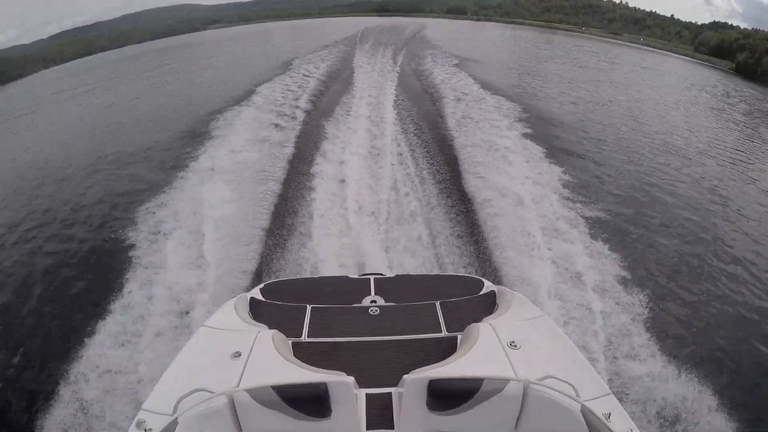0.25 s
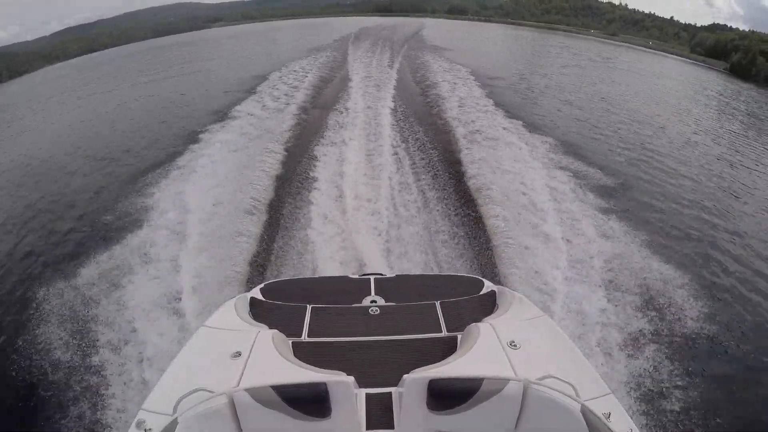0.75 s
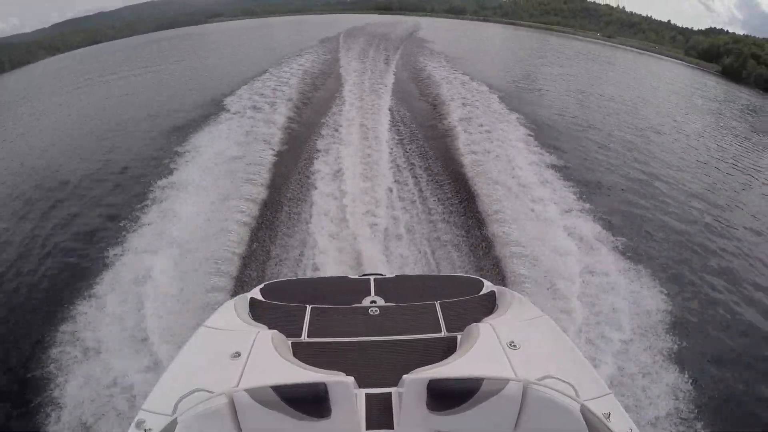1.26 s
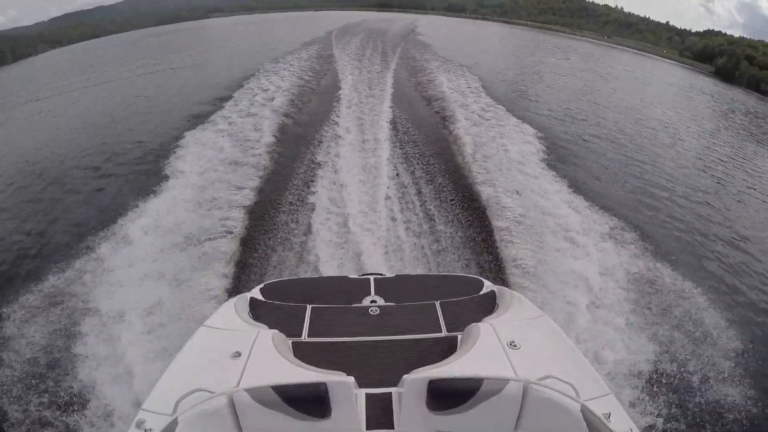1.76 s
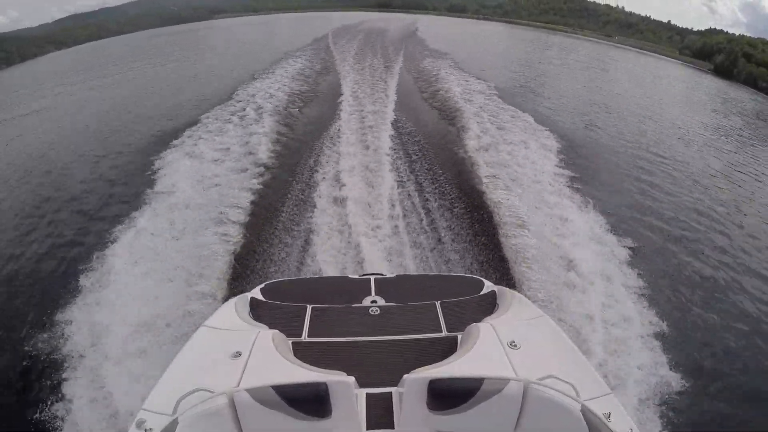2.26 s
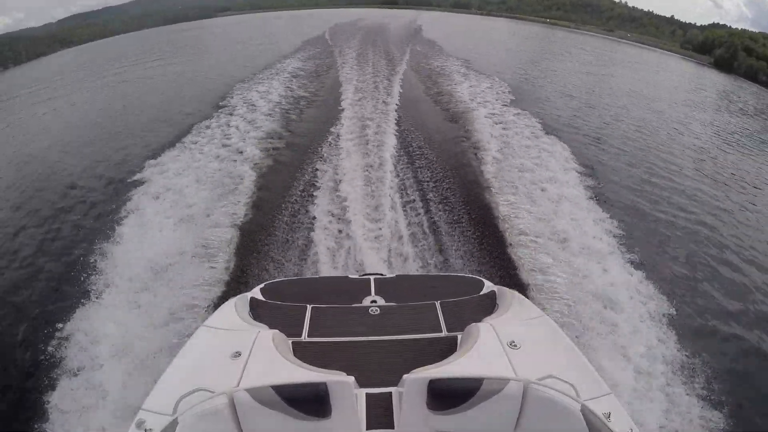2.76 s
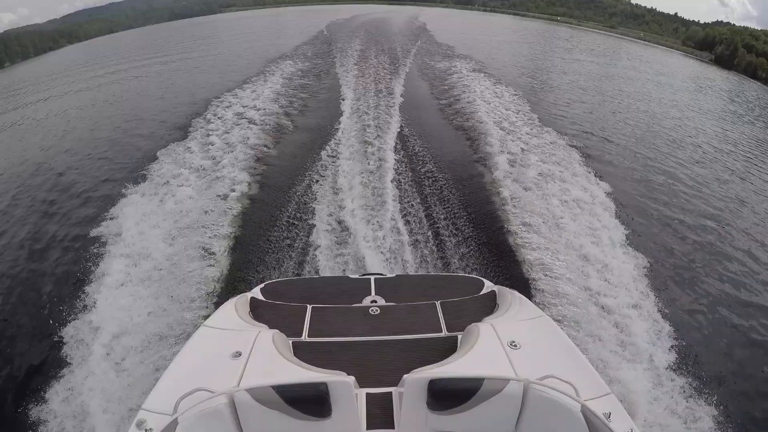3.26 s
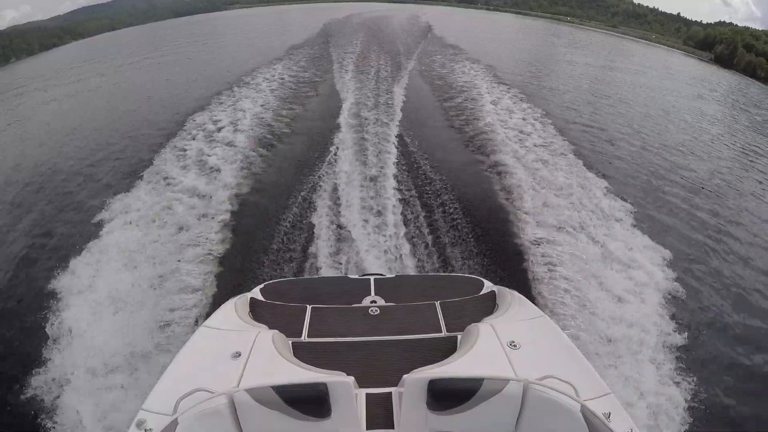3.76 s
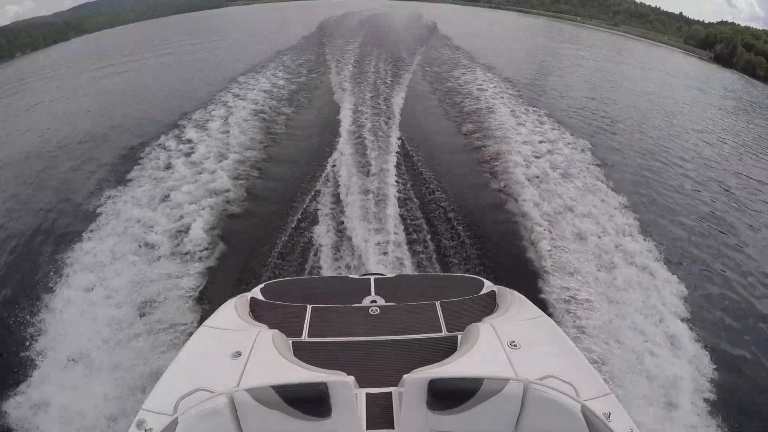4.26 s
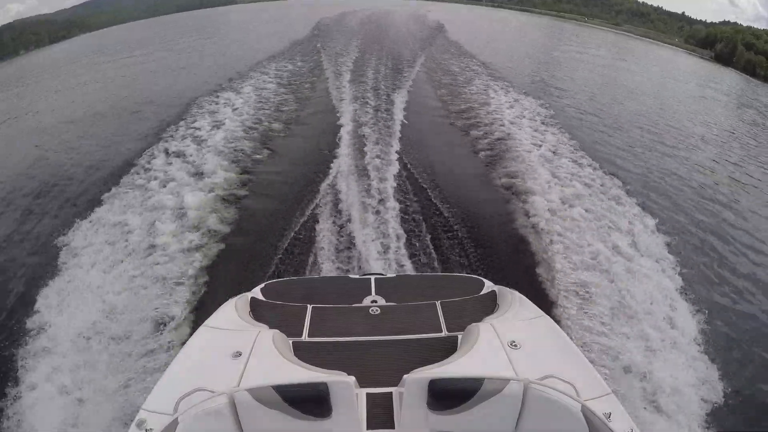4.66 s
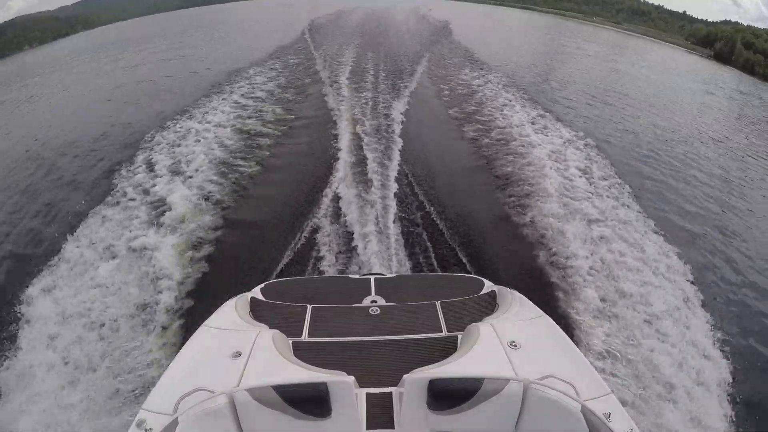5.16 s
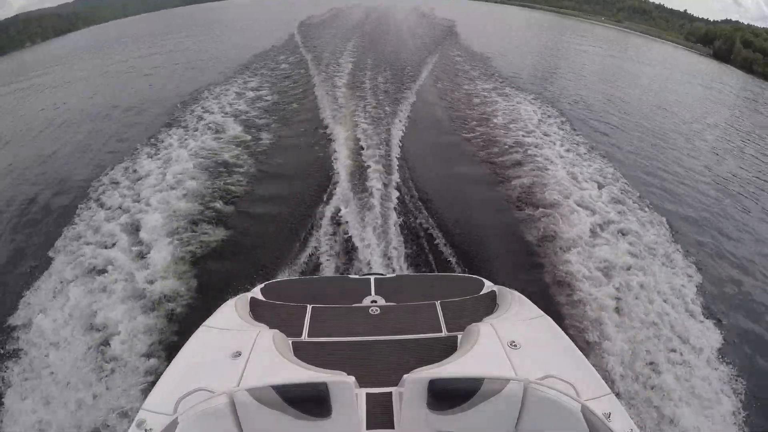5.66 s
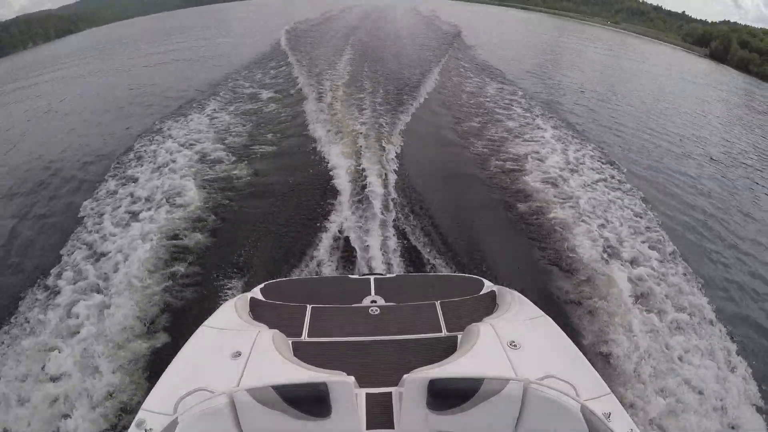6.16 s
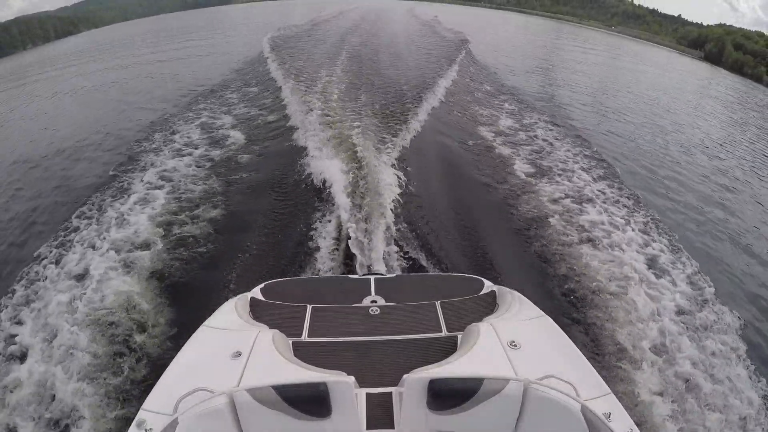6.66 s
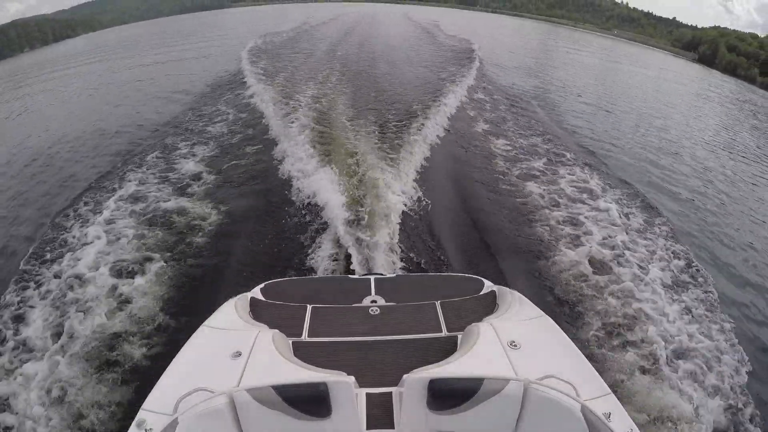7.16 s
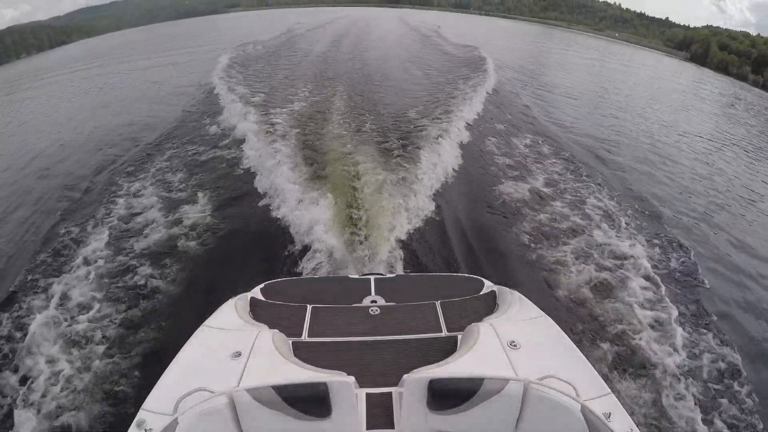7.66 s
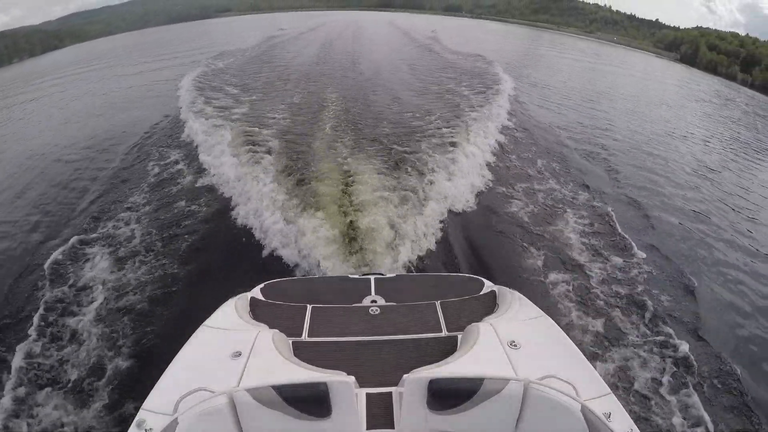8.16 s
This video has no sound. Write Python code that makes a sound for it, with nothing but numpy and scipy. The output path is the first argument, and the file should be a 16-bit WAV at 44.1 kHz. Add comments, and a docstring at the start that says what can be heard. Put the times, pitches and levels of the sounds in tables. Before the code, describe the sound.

Wind pops and rumbles on the microphone over rushing water, then eases as a boat's engine hum and foamy wash grow.

```python
"""A jet boat throttles back on a lake, heard from the deck. At first fast air pops, ticks and flutters on
the microphone, over deep buffeting and the roar of water under the hull; spray hisses off the planing hull.
From about 3 s the wind eddies die away as the boat slows. From about 5 s the eight-cylinder engine drones
louder through the hull. Near 6 s the wake swells astern and a high hiss opens up. Around 7 s a rough low
engine churn rises and a thin top hiss steps up; near 8 s the engine note sags a little."""
import sys
import numpy as np
from scipy import signal
from scipy.fft import rfft, irfft, next_fast_len
from scipy.io import wavfile
from scipy.ndimage import uniform_filter1d, minimum_filter1d, map_coordinates

SR = 44100
rng = np.random.default_rng(int(sys.argv[2]) if len(sys.argv) > 2 else 0)


def transcribe(u):
    """Save the signal u as a 16-bit wav file named by the first command-line argument.

    u: samples, shape (n,) or (channels, n), limited to [-1, 1]; the rate is SR.
    q: integer samples, one column per channel.
    """
    v = np.clip(np.atleast_2d(u).T, -1, 1)
    q = np.round(v * 32767).astype(np.int16)
    wavfile.write(sys.argv[1], SR, q)


N = 370881
TIME = np.arange(N) / SR


def amp(db):
    return 10 ** (np.asarray(db) / 20)


def unit(x):
    return x / np.sqrt(np.mean(x ** 2) + 1e-20)


def curves(rows):
    """Automation lanes: one value a sample for each column after the time."""
    times, *columns = np.transpose(rows)
    return [np.interp(TIME, times, column) for column in columns]


def wobble(rate):
    """Smooth random modulation, rate knots a second."""
    knots = rng.standard_normal(int(N * 400 / SR))
    coarse = np.arange(0, N + 16, 16)
    return np.interp(np.arange(N), coarse, map_coordinates(knots, [coarse * rate / SR]))


def swells(rows):
    """An envelope of flat-topped swells from rows of centre t/s, length/s, level/dB."""
    t = np.arange(0, N / SR, .001)
    centre, length, db = np.transpose(rows)[..., None]
    shapes = np.exp(-(2 * (t - centre) / length) ** 4)
    return np.interp(TIME, t, np.sum(amp(db) * shapes, axis=0))


def filtered(x, response):
    """x through a gain that is a function of frequency."""
    size = next_fast_len(N + 8192)
    return irfft(rfft(x, size) * response(np.fft.rfftfreq(size, 1 / SR)), size)[..., :N]


def coloured(x, eq):
    """x through an EQ curve of f/Hz, level/dB points; white noise keeps its rms."""
    f, db = np.transpose(eq)
    return filtered(x, lambda hz: unit(amp(np.interp(np.log(hz + 1), np.log(f + 1), db, -120, -120))))


def steady(eq):
    """An even noise bed of rms 1."""
    return unit(coloured(rng.standard_normal(N), eq))


def rush(eq, patchy_db):
    """A noise bed of rms 1 with patches of random gain in time and frequency."""
    spectra = signal.stft(rng.standard_normal(N), nperseg=512)[2]
    patches = uniform_filter1d(rng.standard_normal(spectra.shape), size=6, axis=0)
    patches = unit(uniform_filter1d(patches, size=10, axis=1))
    noise = signal.istft(spectra * amp(patchy_db * patches), nperseg=512)[1][:N]
    return unit(coloured(noise, eq))


def evened(x, share=.3, window_s=.035):
    """x at rms 1, with a share of its short level swings ironed out."""
    level = np.sqrt(np.abs(uniform_filter1d(x ** 2, size=int(window_s * SR))) + 1e-3)
    return unit(x / level ** share)


def burst(t, width_s):
    """A bell-shaped noise transient with the same energy on every hit."""
    shape = np.exp(-.5 * (t / width_s) ** 2)
    noise = shape * rng.standard_normal(len(t))
    return noise * np.linalg.norm(shape) / np.linalg.norm(noise)


# Noise-bed faders: t/s, then level/dB of spray, wash, folding wave, wake, high hiss, top hiss
BED_FADERS = [(0, -41.5, -30, -67, -47.5, -73, -109), (2, -42, -29.5, -68, -44.5, -62.5, -105),
              (3.1, -39, -43.5, -47, -50, -68, -101), (3.7, -37, -41, -42, -54, -67.5, -98),
              (4.8, -35, -33.5, -35.5, -65, -67, -92.5), (5.6, -36, -32.5, -34, -44, -59.5, -91),
              (5.9, -36, -31, -32, -38.5, -51.5, -84.5), (6.3, -40, -30, -31, -36, -44.5, -73.5),
              (6.7, -37, -27, -32, -36.5, -44.5, -73.5), (7, -37, -27, -31, -35, -45, -64.5),
              (7.2, -40, -30.5, -33.5, -35, -47, -57.5), (8.41, -43, -31, -33.5, -33, -48, -57.5)]
# EQ of each of those layers: f/Hz, level/dB
SPRAY_EQ = [(1000, -30.5), (1600, -27.5), (2300, 1), (3000, -1), (3700, -0.5), (4500, -6), (6000, -8.5),
            (7500, -19.5), (10000, -34.5), (13000, -69.5)]
WASH_EQ = [(260, -32.5), (450, -2), (750, -1), (1000, -1), (1300, -5), (1800, -14), (2600, -31.5),
           (4000, -71)]
FOLDING_WAVE_EQ = [(800, -34), (1300, -8.5), (1700, -4), (2200, -7.5), (2600, -13.5), (3500, -38)]
WAKE_EQ = [(1530, -38.5), (2600, -16.5), (2950, 0), (3310, -3), (4130, -1.5), (4460, -0.5), (5650, -2),
           (7600, -17.5), (9880, -39), (16700, -120)]
HIGH_HISS_EQ = [(4240, -10.5), (7200, -3), (11200, -22), (12000, -30), (15600, -50), (22000, -120)]
TOP_HISS_EQ = [(6760, -34), (11500, -9), (12300, -1), (13100, 0), (14100, -1.5), (15100, -7)]

def water_and_hiss():
    """Spray flies off the hull and the wake washes closer as it settles; two plain hiss bands sit above."""
    spray_db, wash_db, wave_db, wake_db, high_db, top_db = curves(BED_FADERS)
    flicker = amp(0.42 * wobble(40))
    water = amp(spray_db) * rush(SPRAY_EQ, patchy_db=0.34)
    water += amp(wash_db) * rush(WASH_EQ, patchy_db=1.24)
    water += amp(wave_db) * rush(FOLDING_WAVE_EQ, patchy_db=0.85)
    water += amp(wake_db) * rush(WAKE_EQ, patchy_db=0.4)
    high_hiss = amp(high_db) * rush(HIGH_HISS_EQ, patchy_db=1.5)  # around 7 kHz, opens up near 6 s
    top_hiss = amp(top_db) * rush(TOP_HISS_EQ, patchy_db=1.2)  # thin, 12-15 kHz, steps up near 7 s
    return flicker * (water + high_hiss) + top_hiss


# Engine pitch: t/s, firing rate f/Hz
FIRING_RATE = [(0, 117.7), (5.7, 118.6), (6.15, 118), (7.2, 117.4), (7.85, 117.1), (8, 112.4),
               (8.41, 111.6)]
# Fader of the low drone: t/s, level/dB
DRONE_FADER = [(0, -35), (1.2, -31.5), (1.6, -24), (2.1, -29.5), (3.3, -24), (4.3, -26.5), (4.7, -21),
               (4.9, -23.5), (5.2, -16), (5.45, -22), (5.62, -16.5), (5.8, -22.5), (5.95, -17), (6.2, -19),
               (6.55, -21), (6.92, -12), (7.15, -16.5), (7.5, -24), (7.85, -12.5), (8, -23), (8.2, -18.5),
               (8.41, -25.5)]
# Engine-bay faders: t/s, then level/dB of middle orders, boom, upper boom
BAY_FADERS = [(0, -29.5, -32.5, -35), (4.5, -39.5, -37, -47), (5, -28.5, -31.5, -41),
              (5.5, -37.5, -37.5, -41), (6.2, -29, -32, -42), (6.45, -31, -32.5, -41),
              (6.65, -39, -26, -43), (6.95, -25.5, -37.5, -27.5), (7.15, -19, -31.5, -30.5),
              (7.45, -29, -26.5, -31.5), (7.75, -27.5, -26, -28.5), (8.05, -19.5, -25, -30.5),
              (8.2, -32.5, -26.5, -32.5), (8.41, -39.5, -27, -34)]
# Engine partials: multiple of the cycle rate, level/dB
LOW_ORDERS = [(3, -11), (8, 1.5)]
MIDDLE_ORDERS = [(10, 3.5), (12, 0.5), (14, 0)]
# EQ of the bay's two boom bands and of the firing tone's rough skirt: f/Hz, level/dB
BOOM_EQ = [(220, -25.5), (270, -7), (295, 0.5), (320, -3), (345, -7), (400, -23.5)]
UPPER_BOOM_EQ = [(300, -18), (335, -3.5), (355, -3), (378, -7.5), (410, -10.5), (445, -18), (492, -5),
                 (535, -11.5), (700, -37)]
SKIRT_EQ = [(85, -25.5), (108, 3), (118, 7), (135, -8.5), (170, -9), (210, -10.5), (260, -25.5)]

def engine():
    """Uneven firing makes each engine order swell and drift; the engine bay booms in ragged lumps."""
    cycle_phase = 2 * np.pi * np.cumsum(curves(FIRING_RATE)[0]) / SR / 8  # eight firings a cycle
    drone_db = curves(DRONE_FADER)[0]
    middle_db, boom_db, upper_db = curves(BAY_FADERS)

    def orders(table, swell_db, drift_rad):
        tone = np.zeros(N)
        for order, db in table:
            level = np.sqrt(2) * amp(db + swell_db * wobble(9))
            tone += level * np.sin(order * cycle_phase + drift_rad * wobble(14))
        return tone

    boom = amp(boom_db) * steady(BOOM_EQ) + amp(upper_db) * steady(UPPER_BOOM_EQ)
    boom *= unit(amp(wobble(22)))
    skirt = amp(drone_db - 3.5) * steady(SKIRT_EQ)
    drone = amp(drone_db) * orders(LOW_ORDERS, swell_db=0.68, drift_rad=1.03)
    middle = amp(middle_db) * orders(MIDDLE_ORDERS, swell_db=2.8, drift_rad=1.44)
    return drone + middle + boom + skirt


# Strength of the air over the microphone: t/s, level/dB
WIND_STRENGTH = [(0, -14.5), (.3, -16), (.5, -18), (1.1, -18.5), (1.4, -16), (1.55, -19), (1.65, -24),
                 (1.85, -20), (2.04, -25), (2.2, -21.5), (3, -24.5), (4, -27), (5, -31.5), (6, -33.5),
                 (7, -38), (8.41, -36)]

def ride_wind(db, slope):
    """A level that is db at a wind strength of -18 dB and moves slope dB per dB."""
    return db + slope * (curves(WIND_STRENGTH)[0] + 18)


# EQ of the low, ragged tearing and churn: f/Hz, level/dB
TEARING_EQ = [(100, -47), (170, 1), (220, 0.5), (300, -3.5), (400, -6), (550, -15.5), (900, -47.5)]

def tearing():
    """Air tears raggedly at the microphone; a rough engine churn rises late in the same low band."""
    airflow = amp(ride_wind(-19, slope=1.01))
    gusts = amp(ride_wind(-5, slope=-0.33)) * (swells(GUSTS) + puffs())  # slow air tears deeper
    engine_churn = amp(-28) / (1 + np.exp((7.05 - TIME) / 0.21))  # fades in around 7 s
    lumps = amp(2.5 * wobble(45) + 1.1 * wobble(6.1))
    return (airflow + gusts + engine_churn) * unit(lumps * rush(TEARING_EQ, patchy_db=2.0))


# Low-end faders: t/s, buffeting level/dB, roar level/dB
RUMBLE_FADERS = [(0, -14, -9), (.5, -16.5, -11.5), (.85, -13.5, -12), (1.1, -15, -15.5), (1.6, -15, -14),
                 (2, -17, -12.5), (2.3, -20, -14.5), (2.7, -20.5, -12.5), (3, -17, -16.5),
                 (3.6, -18, -15.5), (4.1, -16.5, -17.5), (4.4, -24.5, -16.5), (4.6, -18.5, -15.5),
                 (5, -24, -20), (5.8, -19.5, -19), (6.5, -28.5, -19), (7.2, -26, -17.5), (7.7, -27, -20.5),
                 (8.2, -21, -19.5), (8.41, -22.5, -15.5)]
# EQ of the wind buffeting and the hull roar: f/Hz, level/dB
BUFFET_EQ = [(6, -17), (14, -9), (22, -10.5), (33, 3), (44, 8), (52, -1), (65, 5), (90, -6.5), (130, -38.5)]
ROAR_EQ = [(30, -19), (60, -4.5), (80, 2), (110, 4), (150, 1.5), (200, -4.5), (280, -15), (450, -29.5)]
# Brief dropouts of the low end: centre t/s, length/s, share removed/dB
LULLS = [(2.84, 0.032, -8), (3.27, 0.021, -5), (4.0, 0.02, 0)]

def rumble():
    """Slow wind pressure on the microphone and the roar of water under the hull, with tearing on top."""
    buffet_db, roar_db = curves(RUMBLE_FADERS)
    tear = tearing()
    roar = amp(roar_db + 0.5 * wobble(6.1)) * evened(rush(ROAR_EQ, patchy_db=0.9))
    buffet = amp(buffet_db) * evened(steady(BUFFET_EQ))
    duck = 1 - np.clip(swells(LULLS), 0, .9)
    return (buffet + roar + tear) * duck


# The loudest ticks in the fast air: t/s, level/dB
TICK_CUES = [(0.0465, -18), (0.116, -11.5), (0.1346, -24.5), (0.1548, -21.5), (0.1877, -18),
             (0.2209, -22.5), (0.2384, -15), (0.2538, -14.5), (0.2984, -22), (0.3225, -15.5), (0.396, -25),
             (0.4254, -21.5), (0.4319, -19), (0.4504, -19.5), (0.509, -24), (0.5474, -17.5), (0.631, -27.5),
             (0.6693, -22), (0.703, -22.5), (0.7087, -18.5), (0.7317, -27.5), (0.7467, -20),
             (0.7706, -25.5), (0.8044, -27), (0.828, -20.5), (0.8667, -21), (0.9233, -18), (0.9755, -22.5),
             (0.9971, -22.5), (1.0252, -25), (1.0532, -28.5), (1.0789, -19), (1.0874, -15.5), (1.1119, -21),
             (1.2136, -18.5), (1.267, -27), (1.297, -19.5), (1.3239, -26.5), (1.3344, -17.5),
             (1.3432, -19.5), (1.3773, -19), (1.4033, -20), (1.4448, -26.5), (1.488, -25.5), (1.595, -20.5),
             (1.6086, -16.5), (1.6841, -19.5), (1.731, -24), (1.7998, -27.5), (1.961, -25.5),
             (2.2268, -22.5), (2.2968, -22), (2.7198, -23), (2.867, -23)]
# Their thin, bright EQ: f/Hz, level/dB
TICK_EQ = [(900, -34.5), (1500, 7), (2200, 8), (3000, 1), (4500, -7), (5500, -9), (7000, -26), (10000, -39),
           (11000, -104)]

def ticks(faint_count=70):
    """Millisecond ticks in the fast air: cued hits, and faint ones scattered over the first 3 s."""
    when, loudness = rng.uniform(0, 1, (faint_count, 2)).T
    faint_s = .02 + 3 * when ** 1.4
    faint_db = ride_wind(-29, slope=0.92)[(faint_s * SR).astype(int)] + 9 * (loudness - .5)
    track, t = np.zeros(N), np.arange(-200, 200) / SR
    for s, db in [*zip(faint_s, faint_db), *TICK_CUES]:
        start = round((s + .0015) * SR) - 200
        track[start:start + len(t)] += amp(db) * burst(t, width_s=0.00091)
    return coloured(track, TICK_EQ)


def small_pops(flutter, count=50):
    """Random cues laid out like POP_CUES, denser and louder where the flutter envelope is high."""
    when, size, pitch, grit = rng.uniform(0, 1, (count, 4)).T
    margin = SR // 20
    density = flutter[margin:-margin]
    at = np.searchsorted(np.cumsum(density) / density.sum(), when) + margin
    peak_db = 20 * np.log10(flutter[at]) + 13 - size
    crack_db = -19 + 16 * (grit - .5)
    return np.transpose([at / SR, peak_db, 450 * 2 ** (pitch ** 2), crack_db])


# The strongest eddy pops: t/s, peak level/dB, f/Hz, crack level/dB relative to the pop
POP_CUES = [(0.097, -12.5, 910, -23.5), (0.153, -11, 495, -16.5), (0.219, -6, 686, -10.5),
            (0.449, -17, 466, 0), (0.503, -8, 447, -25), (0.545, -16.5, 606, -18.5),
            (0.672, -4, 1020, -22.5), (0.706, -5, 538, -15), (0.765, -8, 568, -29.5), (0.804, -11, 546, -8),
            (0.918, -8.5, 1020, -7.5), (1.051, -8, 584, -19.5), (1.145, -8.5, 614, -17),
            (1.175, -5.5, 581, -9), (1.218, -12.5, 619, -11.5), (1.265, -15.5, 506, -7.5),
            (1.304, -13.5, 471, -18.5), (1.413, -9, 573, -23), (1.531, -6.5, 474, -19.5),
            (1.59, -3.5, 790, -16), (1.67, -4, 659, -14), (1.808, -13, 501, -9.5), (1.862, -6, 851, -17.5),
            (1.826, -7, 800, -18), (1.891, -5.5, 579, -16.5), (1.949, -1, 662, -16.5),
            (1.991, -9.5, 800, -21), (2.022, -16, 700, -18.5), (2.074, 0.5, 579, -17),
            (2.105, -7.5, 600, -19), (2.148, -4.5, 466, -10.5), (2.173, -6, 668, -7.5),
            (2.194, -12.5, 800, -6.5), (2.228, -12.5, 700, -8), (2.3, -12, 600, -13),
            (2.325, -5.5, 554, -8.5), (2.387, -11.5, 600, -15.5), (2.458, -8.5, 544, -13),
            (2.495, -6.5, 452, -14.5), (2.52, 0.5, 700, -17.5), (2.609, -7, 1030, -15.5),
            (2.631, -6.5, 460, -15.5), (2.668, -13.5, 600, -16), (2.695, -9.5, 600, -9),
            (2.722, -8, 800, -8.5), (2.746, -4, 600, -19.5), (2.772, -11.5, 600, -18),
            (2.809, -2, 452, -17.5), (2.828, -10, 900, -16), (2.847, -13, 900, -19.5),
            (2.867, -4.5, 452, -10), (2.901, -10, 600, -18), (2.944, -3.5, 650, -15.5),
            (2.984, -11.5, 600, -16.5), (3.028, -6.5, 452, -21), (3.059, -8, 493, -16.5),
            (3.13, -9, 587, -23), (3.148, -31, 500, -14), (3.173, -22.5, 450, -22.5),
            (3.221, -12, 534, -28.5), (3.268, -23, 450, -11.5), (3.325, -17.5, 600, -21),
            (3.346, -13, 500, -17), (3.36, -9, 600, -12.5), (3.399, -0.5, 500, -17.5),
            (3.451, -13, 673, -14), (3.477, -9, 418, -21), (3.5, -11, 400, -27.5), (3.556, -10, 590, -15),
            (3.585, -17.5, 600, -30), (3.617, -17.5, 450, -23), (3.654, -9, 520, -18.5),
            (3.683, -15, 563, -18.5), (3.731, -14, 510, -18), (3.744, -17, 650, -19.5),
            (3.762, -9.5, 500, -16.5), (3.777, -16, 500, -12.5), (3.791, -12.5, 550, -16.5),
            (3.822, -12.5, 455, -17), (3.835, -2.5, 536, -21), (3.886, -8.5, 476, -12.5),
            (3.903, -20, 700, -15.5), (3.924, -11, 600, -18), (3.935, -11.5, 700, -14.5),
            (4.013, -13.5, 401, -17), (4.036, -14.5, 600, -12), (4.053, -10, 420, -19.5),
            (4.085, -5.5, 500, -22.5), (4.165, -16.5, 500, -20.5), (4.204, -17, 400, -12),
            (4.266, -19.5, 400, -21.5), (4.297, -14.5, 400, -15.5), (4.347, -24, 450, -13.5),
            (4.412, -9, 773, -13.5), (4.445, -24, 400, -14.5), (4.463, -16.5, 420, -17.5),
            (4.484, -14, 800, -16.5), (4.518, -14.5, 450, -16.5), (4.571, -6, 800, -23.5),
            (4.595, -17, 595, -8), (4.625, -11.5, 493, -20.5), (4.739, -23.5, 800, -18),
            (4.785, -25.5, 450, -17.5), (4.821, -22.5, 420, -14.5), (4.936, -21, 573, -11),
            (4.971, -13.5, 650, -20), (5.012, -7.5, 600, -14.5), (5.051, -19, 420, -18),
            (5.066, -12, 466, -23), (5.112, -14, 400, -18.5), (5.136, -12.5, 608, -16),
            (5.164, -14, 600, -15), (5.379, -14, 727, -13), (5.469, -11.5, 600, -19), (5.49, -8, 600, -17),
            (5.52, -12, 493, -15), (5.759, -13.5, 400, -25), (5.777, -14.5, 400, -23),
            (5.931, -12, 600, -19.5), (5.954, -16, 500, -19.5), (6.047, -12, 500, -20)]

def eddy_pops(flutter, dull_hz=2200):
    """A strong eddy pops as one or two cycles of tone and a crack; returns a stem for each."""
    cues = np.vstack([small_pops(flutter), POP_CUES])
    pops, bright, dull = np.zeros((3, N))
    t = np.arange(-400, 400) / SR
    for (s, db, hz, crack_db), (phase, dullness) in zip(cues, rng.uniform(0, 2 * np.pi, (len(cues), 2))):
        start = round((s + .002) * SR) - 400
        span = slice(start, start + len(t))
        envelope = amp(db) * np.exp(-.5 * (t * hz / 0.35) ** 2)
        pops[span] += envelope * np.cos(2 * np.pi * hz * t + phase)
        crack = amp(db + crack_db) * burst(t, width_s=0.0012)
        dull_share = np.sin(dullness / 4) ** 2  # a random part of each crack is low-passed
        bright[span] += (1 - dull_share) * crack
        dull[span] += dull_share * crack
    return pops, bright + filtered(dull, lambda hz: 1 / (1 + (hz / dull_hz) ** 4))


def puffs(length_s=0.012):
    """Envelope of the short puff of flutter around each cued pop."""
    return swells([(s + .003, length_s, db - 18.5) for s, db, *_ in POP_CUES])


# Gusts on the microphone: centre t/s, length/s, flutter level/dB
GUSTS = [(.1, 0.1234, -22), (.24, .1, -21), (.44, 0.0594, -22.5), (.55, 0.0494, -23), (.7, .1, -22),
         (.83, 0.0488, -24.5), (.92, 0.0409, -21), (1.08, 0.0599, -22), (1.22, 0.0592, -23),
         (1.38, .12, -22.5), (1.6, 0.04, -20), (1.685, 0.04, -20), (1.862, .11, -22), (1.958, .035, -21),
         (2.16, .05, -19), (2.21, .06, -23), (2.29, .12, -22), (2.39, .05, -24.5), (2.526, .06, -25),
         (2.721, .16, -24.5), (2.85, .08, -24), (2.971, .08, -22.5), (3.36, .08, -28), (3.47, .05, -25.5),
         (3.593, .1, -29), (3.7, .04, -26), (3.779, 0.054, -27.5), (3.898, .14, -23.5), (4.062, .09, -27.5),
         (4.232, .1, -29), (4.45, 0.064, -30.5), (4.596, .09, -28.5), (4.809, .06, -33), (4.971, .08, -29),
         (5.076, .05, -23.5), (5.158, .07, -29.5), (5.502, .07, -32), (5.774, .035, -31), (5.945, .04, -33),
         (6.052, 0.015, -29)]
# EQ of the eddies' midrange flutter and of their crackle: f/Hz, level/dB
FLUTTER_EQ = [(120, -36), (250, -1.5), (400, -2.5), (700, -3.5), (1100, -7.5), (1450, -14), (1800, -24),
              (2500, -44), (4000, -83.5)]
CRACKLE_EQ = [(700, -18), (1300, 9), (1800, 7), (2700, -2.5), (4000, -8.5), (5200, -12.5), (7000, -54),
              (10000, -53), (11000, -78)]

def eddies(hush_db=-4.5, hush_s=0.014):
    """Small vortices flutter and crackle on the microphone in clumps, and the strongest pop."""
    flutter = np.hypot(amp(ride_wind(-19, slope=1.6)), swells(GUSTS))  # dies first between gusts
    before_pop = swells([(s - hush_s / 2, hush_s, 0) for s, *_ in POP_CUES])
    flutter *= amp(hush_db * np.minimum(1, before_pop))
    clumps_db = 0.98 * wobble(25) + 2.85 * wobble(130) + 1.4 * wobble(60)
    clumps_db *= np.clip(ride_wind(0.88, slope=-5), .3, 1.5)  # fast air packs the clumps into a roar
    body = flutter * unit(amp(clumps_db)) + puffs()
    crackle = (flutter + puffs()) * amp(ride_wind(-13, slope=0.98))  # faster air crackles more
    crackle *= unit(amp(0.79 * clumps_db + 3.3 * wobble(200)))
    pops, cracks = eddy_pops(flutter)
    mids = coloured(body * rng.standard_normal(N), FLUTTER_EQ)
    highs = coloured(crackle * rng.standard_normal(N) + cracks, CRACKLE_EQ)
    return pops + mids + highs


def scene():
    """The mono mix on deck."""
    return (engine() + rumble() + eddies() + ticks() + water_and_hiss())[None]


def record(dry, threshold=0.61, ratio=4, top_hz=15041):
    """A quick compressor leans on the peaks; a brick-wall low-pass trims the top."""
    gain = np.minimum(1, threshold / (np.abs(dry) + 1e-9)) ** (1 - 1 / ratio)
    gain = uniform_filter1d(minimum_filter1d(gain, size=441), size=441)  # hold and smooth over 10 ms
    return filtered(dry * gain, lambda hz: hz < top_hz)


dry = scene()
out = record(dry)
transcribe(out)
```